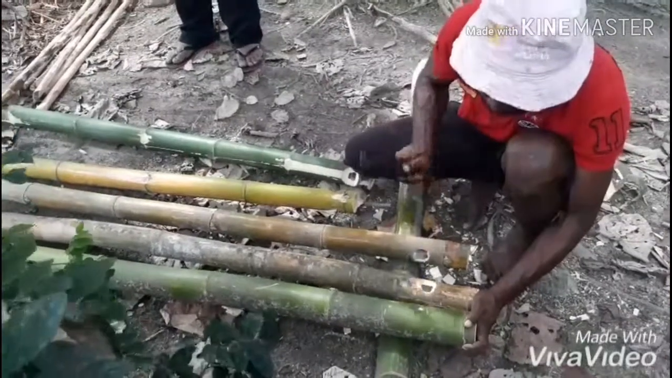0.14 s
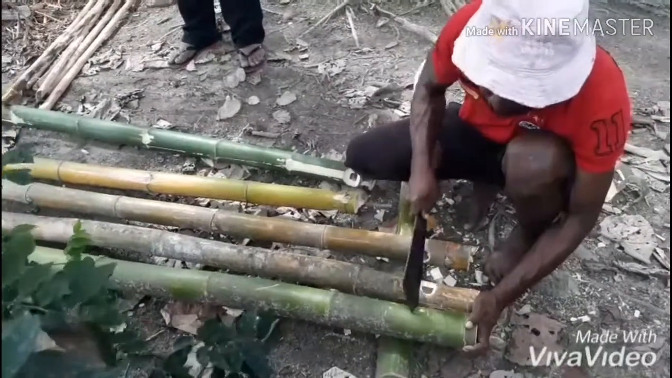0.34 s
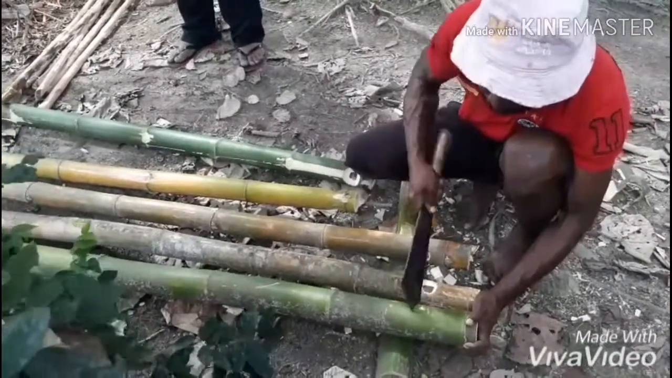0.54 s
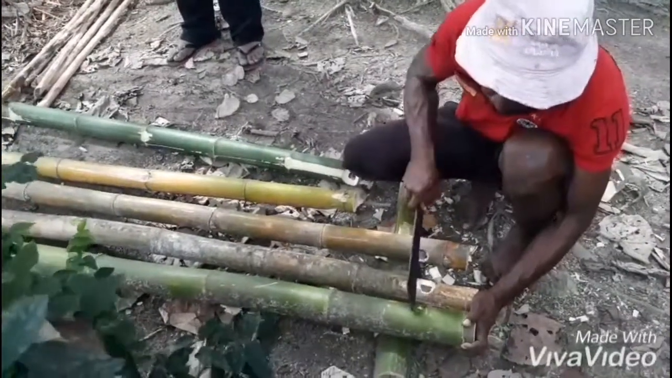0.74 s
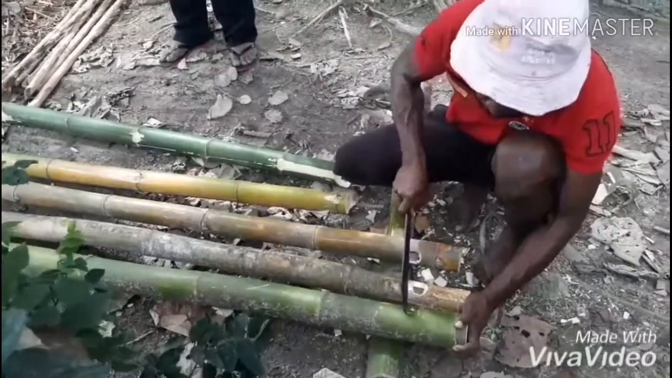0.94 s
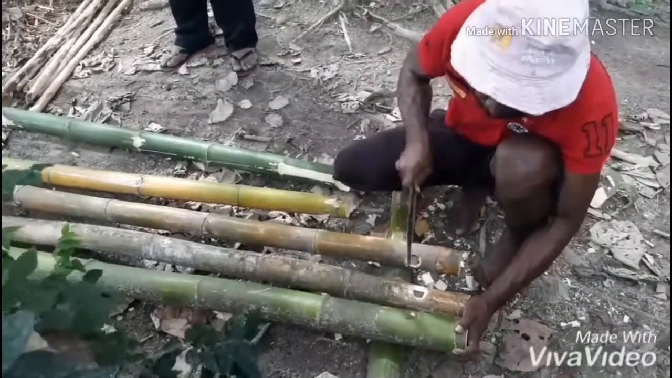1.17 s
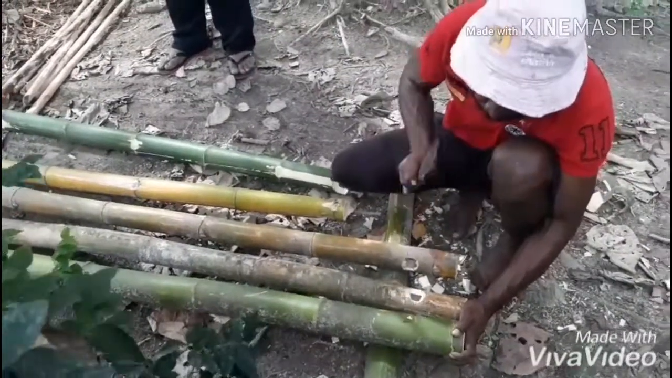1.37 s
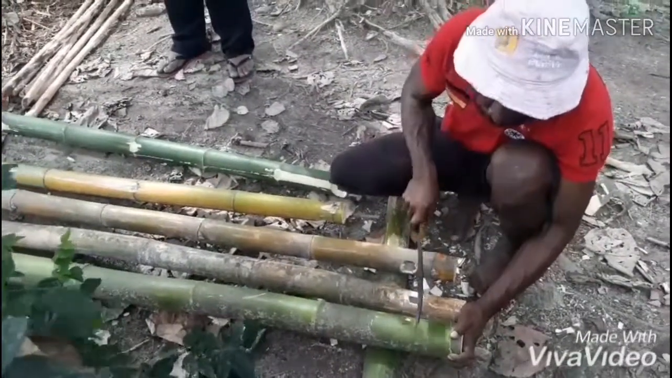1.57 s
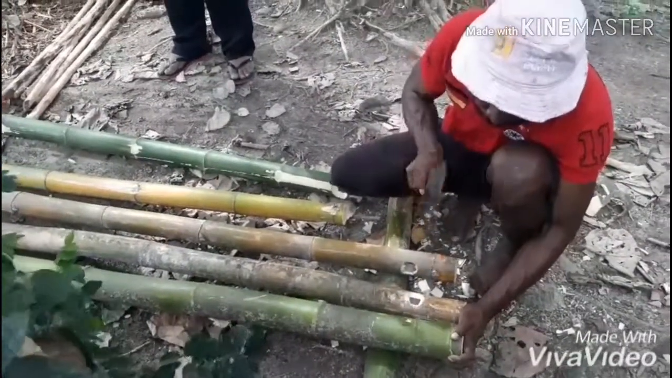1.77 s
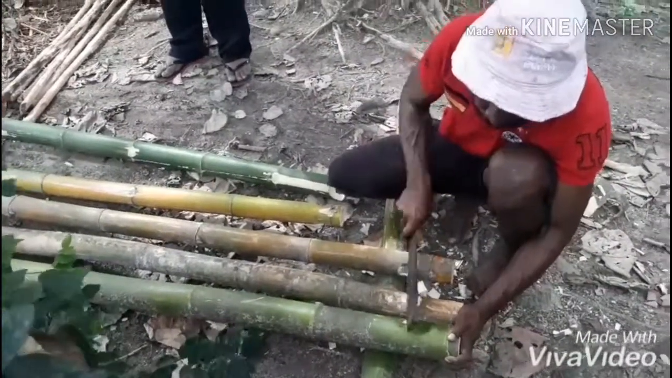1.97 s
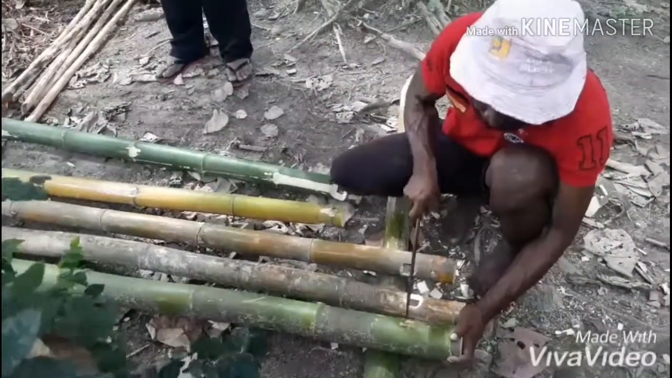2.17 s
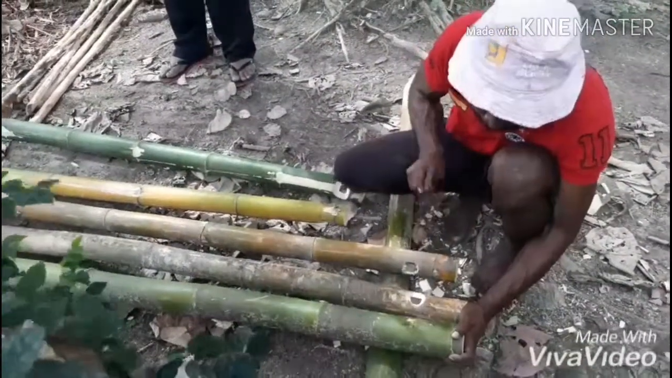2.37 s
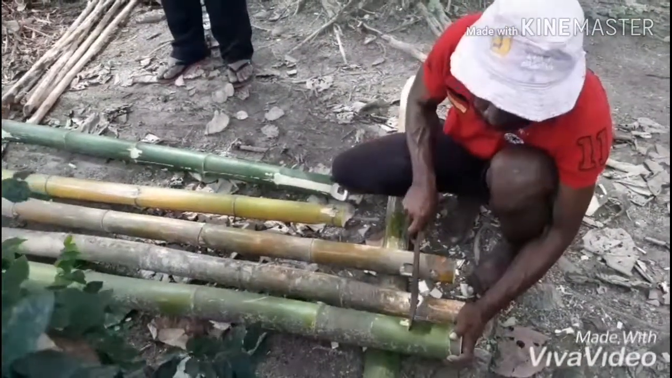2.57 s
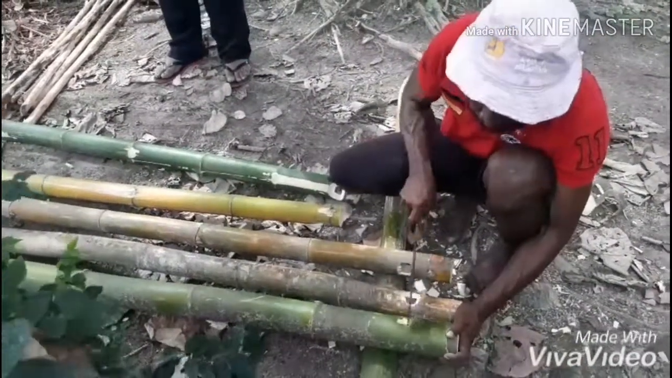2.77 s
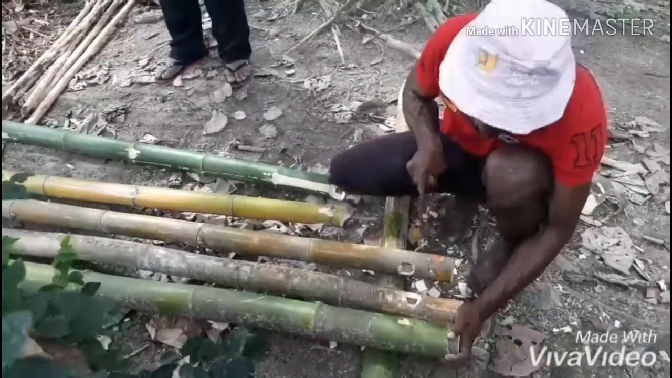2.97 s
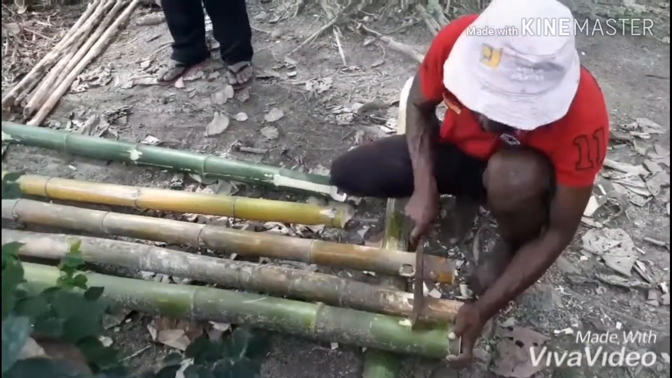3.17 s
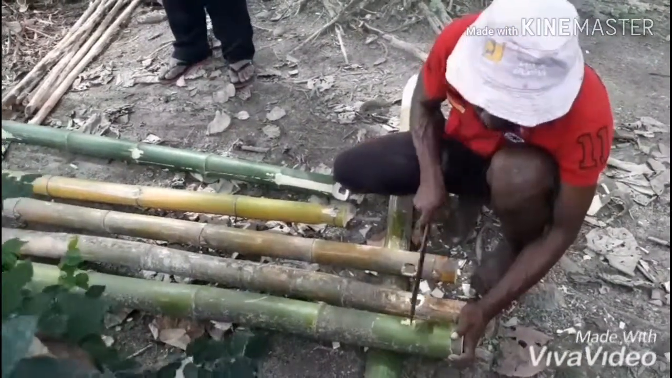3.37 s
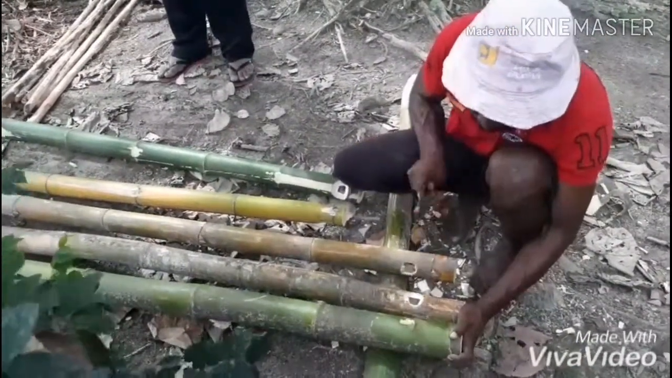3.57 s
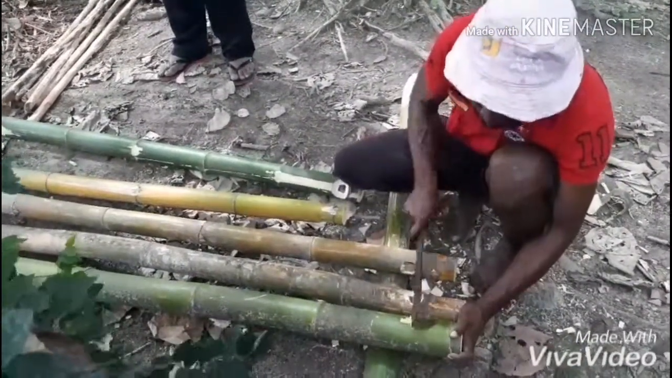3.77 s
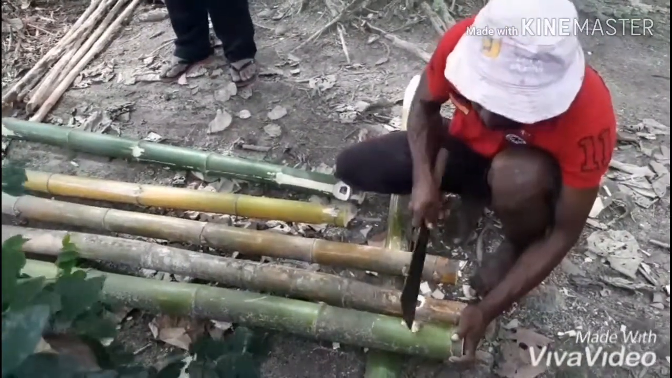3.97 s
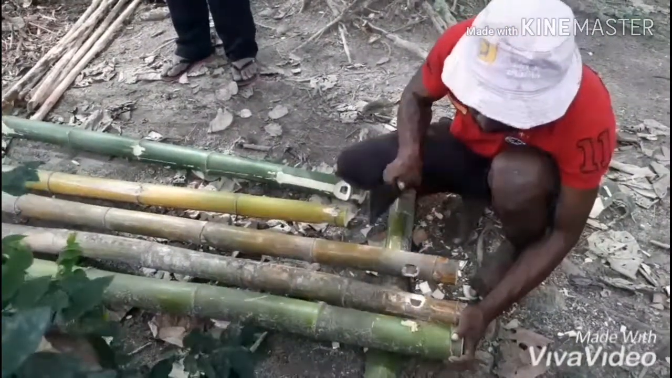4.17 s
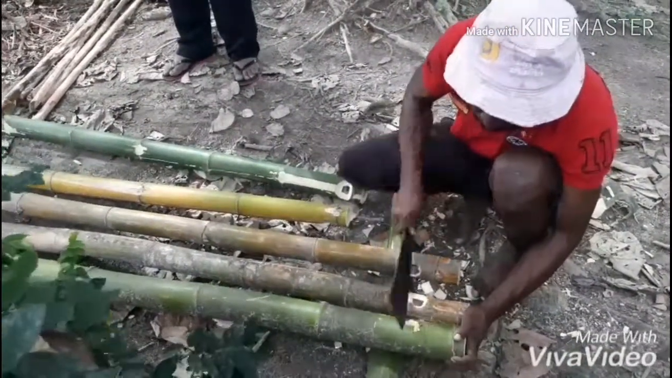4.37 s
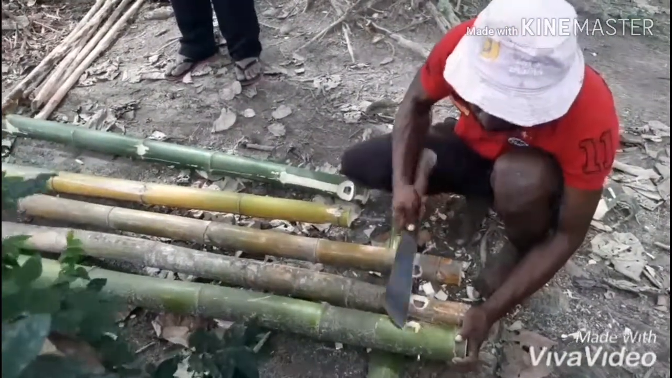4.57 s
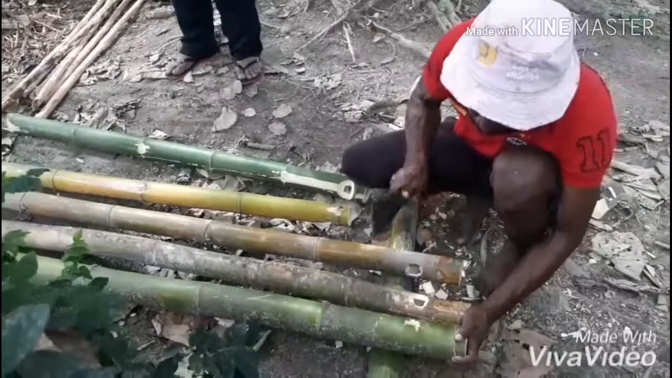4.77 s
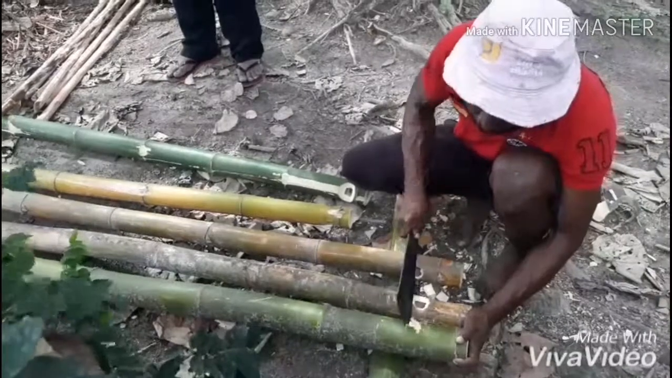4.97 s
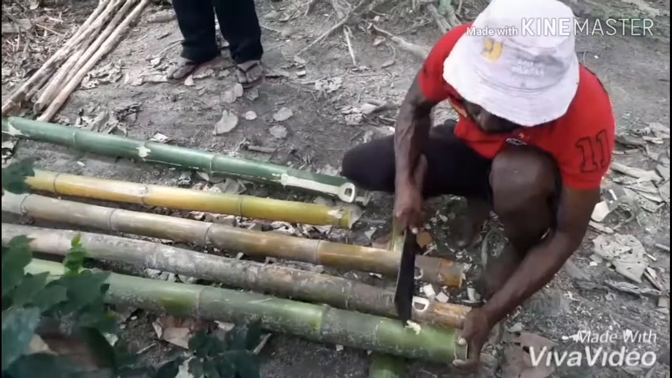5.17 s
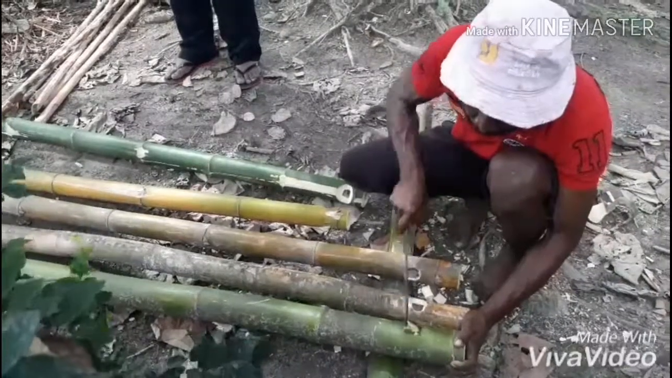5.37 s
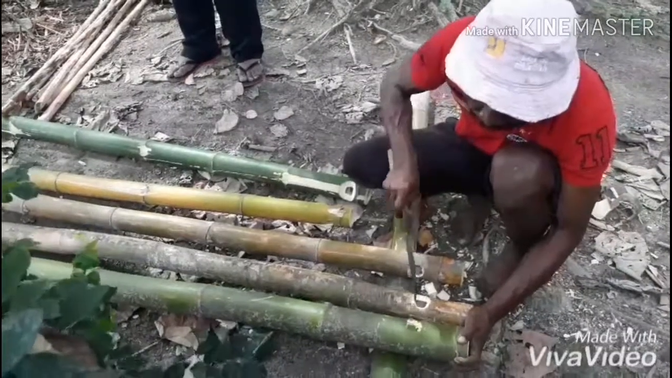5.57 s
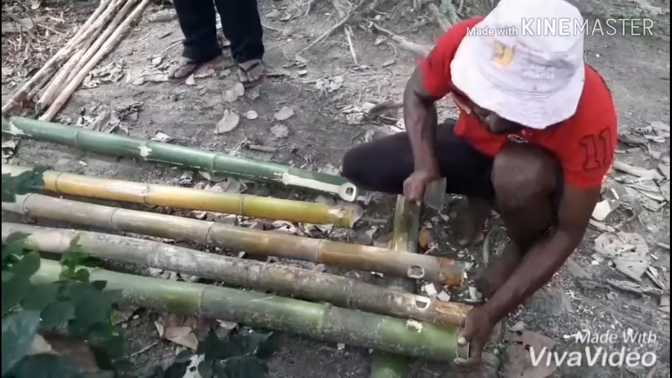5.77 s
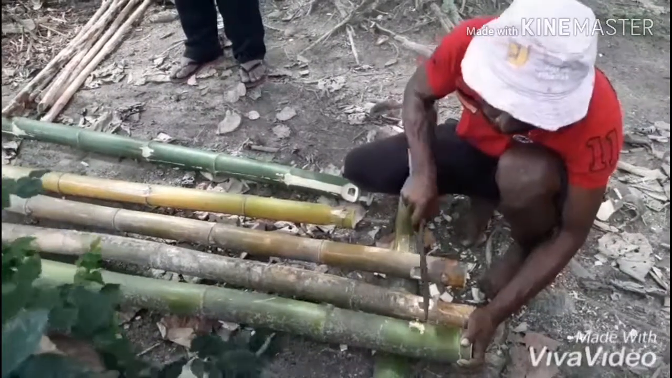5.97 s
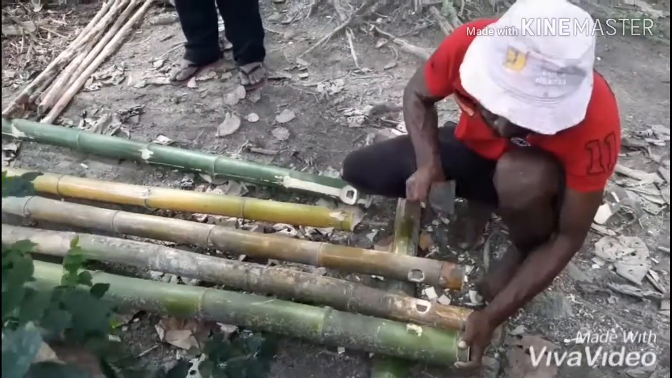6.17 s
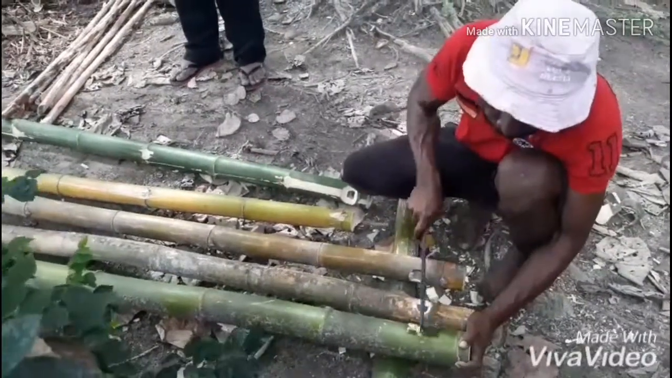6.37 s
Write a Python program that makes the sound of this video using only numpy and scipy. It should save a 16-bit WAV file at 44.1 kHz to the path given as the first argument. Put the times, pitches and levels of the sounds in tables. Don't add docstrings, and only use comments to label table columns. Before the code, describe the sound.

Outdoors on bare ground, a heavy blade chops a notch in a bamboo pole a couple of metres away. Each loud blow crunches through fibre, knocks hollow and leaves a short woody ring. Chips tick down and the blade once scrapes free. Near the end come light knocks and a weak bite, then two strong chops. Wind thumps the phone microphone over faint leaf hiss.

```python
import sys
import numpy as np
from scipy import signal
from scipy.fft import rfft, irfft
from scipy.io import wavfile
from scipy.ndimage import uniform_filter1d

SR = 44100
rng = np.random.default_rng(int(sys.argv[2]) if len(sys.argv) > 2 else 0)


def pcm_store(signal):
    levels = np.round(np.clip(np.atleast_2d(signal), -1, 1) * 32767)
    wavfile.write(sys.argv[1], SR, levels.astype(np.int16).T)


def convert_level_to_amplitude(level_db):
    exponent = np.asarray(level_db, float) / 20
    return 10 ** exponent


N = 284004
TIME = np.arange(SR // 2) / SR

# frequency in Hz, level in dB per Hz.
CRUNCH = [(180, -41.5), (400, -10.5), (800, -15.5), (1580, -9), (2070, -2.5), (2800, -2.5), (4090, -12),
          (4750, -6), (5250, -22), (5800, -7), (8790, -15), (15000, -27.5), (16000, -43.5)]
# strongest eddy in seconds, its peak in dB, its frequency in Hz,
# build in seconds, fall in seconds.
GUSTS = [(.051, -31, 141, .01, 0.024), (.682, -27, 126, 0.0091, .01), (.908, -37, 100, 0.035, 0.024),
         (.972, -24, 150, 0.0089, 0.081), (1.059, -21, 209, 0.073, .05), (1.103, -13.5, 157, 0.051, 0.038),
         (1.535, -21.5, 123, 0.078, 0.065), (1.684, -35, 179, 0.023, 0.035),
         (1.801, -28, 229, 0.011, 0.011), (1.878, -31.5, 165, 0.079, 0.018),
         (1.932, -22.5, 212, .01, 0.047), (1.966, -21.5, 207, 0.059, .01), (2.824, -20, 270, .006, .02),
         (2.840, -10, 210, 0.021, 0.03), (2.880, -25, 191, .008, 0.01), (3.648, -28, 121, 0.09, 0.017),
         (3.688, -27, 195, .01, 0.021), (3.982, -31, 174, 0.072, 0.0091), (4.25, -35.5, 140, 0.074, 0.17),
         (4.598, -26.5, 180, .05, 0.017), (5.896, -28.5, 178, 0.08, 0.026),
         (5.931, -23.5, 157, 0.025, 0.045), (6.119, -31.5, 149, 0.11, .04), (6.321, -37.5, 139, 0.1, 0.018)]


def add(out, start_s, x):
    i = max(int(start_s * SR), 0)
    out[i:i + len(x)] += x[:len(out) - i]


def fade(t60_s):
    return np.exp(-np.log(1000) * TIME / t60_s)


def rise(rise_s):
    return np.minimum(TIME / rise_s, 1)


def sine(hz):
    return np.sin(2 * np.pi * hz * TIME)


def noise(spectrum, count):
    hz, db = np.transpose(spectrum)
    f = np.maximum(np.fft.rfftfreq(count, 1 / SR), 1)
    gain = convert_level_to_amplitude(np.interp(np.log(f), np.log(hz), db, -90, -90))
    x = irfft(rfft(rng.standard_normal(count)) * gain, count)
    return x / np.std(x)


def around(hz, spread):
    edges_hz = [hz / (1 + spread), min(hz * (1 + spread), .45 * SR)]
    sos = signal.butter(2, edges_hz, "bandpass", fs=SR, output="sos")
    band = signal.sosfilt(sos, rng.standard_normal(len(TIME)))
    return band / np.std(band)


def split(x, hz):
    dull = signal.lfilter(*signal.butter(2, hz, fs=SR), x)
    return dull, x - dull


def walk(rate_hz):
    k = int(SR / rate_hz)
    held = np.repeat(rng.standard_normal(N // k + 1), k)
    return 1.26 * uniform_filter1d(uniform_filter1d(held, k), k)[:N]


def ring(modes, scatter_db=0.):
    out = np.zeros(len(TIME))
    for hz, db, t60_s in modes:
        strike, detune, phase = rng.standard_normal(3)
        tone = np.sin(2 * np.pi * hz * (1 + 0.007 * detune) * TIME + phase)
        out += convert_level_to_amplitude(db + scatter_db * strike) * fade(t60_s) * tone
    return out


def returns(x, first_db, later_db):
    round_trip_s = .0191
    out = x.copy()
    for k in range(4):
        add(out, (k + 1) * round_trip_s, convert_level_to_amplitude(first_db + k * later_db) * x)
    return out


def throb(hz, peak_s, spread_s, db, first_db, later_db):
    swell = np.exp(-((TIME - peak_s) / spread_s) ** 2 / 2) * rise(.003)
    tone = sine(hz * (1 + .008 * rng.standard_normal()))
    rough = .3 * returns(swell, first_db, later_db) * around(hz, spread=.1)
    return convert_level_to_amplitude(db) * (returns(swell * tone, first_db, later_db) + rough)


def fibre_crunch(wall_db, notch_db, sliver_hz):
    crunch_db = -14 - .2 * (wall_db + 18.5)
    cut = rise(0.00027) / (1 + (TIME / 0.0039) ** 3.6)
    buzz = 1.15 * sine(sliver_hz) + .6 * around(sliver_hz, spread=0.05)
    sliver = convert_level_to_amplitude(-8.5) * cut * buzz
    body, edge = split(returns(cut, -20.0, -7.0) * noise(CRUNCH, len(TIME)), 5900)
    body_db = 0.53 * notch_db + 10.5
    return convert_level_to_amplitude(crunch_db + 4.0) * (convert_level_to_amplitude(body_db) * body + edge + sliver)


def pole_throbs(hollow_db, wall_db, notch_db, late):
    # frequency in Hz, peak in seconds, spread in seconds, level in dB, first return in dB,
    # change per later return in dB.
    hollow = (862, .0080, .0036, 2, 0.5, -11)
    wall = (1250, .0090, .0036, 3, -7, -7)
    notch = (1965, .0065, .0036, 1.5, -11, -7)
    # frequency in Hz, level in dB, t60 in seconds.
    linger = [(833, -31, 0.37), (902, -34.5, .36)]
    parts = convert_level_to_amplitude(hollow_db) * throb(*hollow) + convert_level_to_amplitude(wall_db) * throb(*wall) + convert_level_to_amplitude(notch_db) * throb(*notch)
    return parts + convert_level_to_amplitude(hollow_db + 11.5) * late * ring(linger, scatter_db=1.5)


def ragged(x):
    streak_octaves, streak_db = .12, 2
    octaves = np.log2(np.maximum(np.fft.rfftfreq(len(x), 1 / SR), 50) / 50)
    bumps = np.interp(octaves / streak_octaves, np.arange(200), rng.standard_normal(200))
    return irfft(rfft(x) * convert_level_to_amplitude(streak_db * bumps), len(x))


def yard_wash(blow_db, late):
    # frequency in Hz, level in dB per Hz.
    yard = [(71, -33.5), (120, -6.5), (393, -0.5), (630, -11.5), (839, -4.5), (1430, -7.5), (2110, -4.5),
            (4410, -20), (5630, -19), (6370, -24), (7200, -22), (13900, -42.5), (16000, -49)]
    # frequency in Hz, level in dB, t60 in seconds.
    poles = [(252, -29, 0.16), (393, -29, 0.34), (444, -27, 0.25), (552.6, -30.5, 0.27), (800, -17.5, 0.15),
             (838, -28, 0.25), (878, -21, 0.18), (988, -23.5, 0.13), (1193, -18, 0.089), (1256, -16, 0.14),
             (1478, -25, 0.077), (1754, -29.5, 0.17), (1973, -19, 0.066), (2154, -12, 0.062),
             (2340, -36, .12), (2780, -19.5, .12), (3035, -27.5, 0.11), (3553, -20.5, 0.068),
             (4800, -29.5, 0.077), (5500, -31.5, .06)]
    shake_db = 0.41 * blow_db
    scatter = convert_level_to_amplitude(-19.5) * fade(0.16) + convert_level_to_amplitude(-19) * fade(0.36)
    patches = convert_level_to_amplitude(1.4 * walk(150)[:len(TIME)])
    tail = ragged(noise(yard, len(TIME))) * scatter * patches
    dull, bright = split(tail + ring(poles, scatter_db=2.5), 1000)
    return convert_level_to_amplitude(1.5 + shake_db) * late * dull + convert_level_to_amplitude(2.5 + shake_db) * rise(0.0061) * bright


def chops():
    # start in seconds, peak in dB, then hollow, wall and notch in dB relative to the peak.
    blows = [(0.348, -0.5, -15.5, -19, -12.5), (1.582, 2, -17, -18.5, -10.5),
             (2.039, -2.5, -11.5, -16, -15), (2.595, -3, -11, -27, -14.5), (3.267, 0.5, -11.5, -20, -8.5),
             (3.8455, -3, -12.5, -10, -35), (4.484, 1, -9.5, -14, -12), (5.039, -4.5, -29, -19, -11.5),
             (5.449, -19, -29, -20.5, -11), (5.9654, -1, -15.5, -39, -33), (6.380, 1.5, -18, -17, -11)]
    slivers_hz = [4610, 5620, 4860, 4760, 5720, 5200, 6980, 7360, 9600, 4640, 4580]
    out = np.zeros(N)
    late = rise(0.02) ** 1.56
    for (start_s, db, hollow_db, wall_db, notch_db), sliver_hz in zip(blows, slivers_hz):
        crunch = fibre_crunch(wall_db, notch_db, sliver_hz)
        pole = pole_throbs(hollow_db, wall_db, notch_db, late)
        add(out, start_s, convert_level_to_amplitude(db) * (crunch + pole + convert_level_to_amplitude(-4.0) * yard_wash(db, late)))
    return out


def blade():
    # start in seconds, peak in dB.
    knocks = [
        (5.345, -42.5),
        (5.503, -39),
        (5.668, -34),
    ]
    # frequency in Hz, level in dB, t60 in seconds.
    knock_modes = [(349.3, -1.5, 0.25), (1126, 1, 0.067), (1287, 5, 0.048)]
    # release in seconds, level in dB, scrape length in seconds.
    scrapes = [
        (1.203, -42.5, 0.028),
        (5.595, -49, 0.013),
    ]
    # frequency in Hz, level in dB, t60 in seconds.
    steel = [(2020, 4, 0.091), (8300, -14, .05), (10080, -14, .13), (11800, -16, .07), (13400, -12, .09)]
    out = np.zeros(N)
    for start_s, db in knocks:
        add(out, start_s, convert_level_to_amplitude(db - 5.5) * rise(0.0024) * ring(knock_modes))
    for release_s, db, scrape_s in scrapes:
        rub = noise(CRUNCH, len(TIME)) * np.exp(-((TIME - .1) / scrape_s) ** 2)
        add(out, release_s - .1, convert_level_to_amplitude(db - 4) * rub)
        add(out, release_s, convert_level_to_amplitude(db) * rise(0.0018) * ring(steel))
    return out


def chips():
    # start in seconds, peak in dB, frequency in Hz, t60 in seconds.
    landings = [(.581, -51, 5200, .025), (.604, -49, 2900, .025), (.883, -42, 2500, .025),
                (1.183, -55, 9000, .02), (1.280, -36, 2600, .022), (3.043, -37, 2500, .025),
                (3.102, -48, 7500, .02), (4.075, -55, 7000, .02), (4.097, -54, 7500, .02),
                (4.133, -43, 3500, .03), (4.135, -50, 10000, .03), (4.217, -51, 5000, .02),
                (4.461, -50, 7000, .02), (4.625, -50, 8000, .04), (4.707, -41, 8200, .03),
                (4.937, -51, 7000, .03), (5.348, -53, 8500, .02), (5.355, -46, 7000, .02),
                (5.432, -47, 5000, .02), (5.439, -49, 10000, .04), (5.449, -38, 10000, .02),
                (5.787, -51, 5500, .02), (2.99, -55, 9000, .02), (5.23, -54, 8000, .02),
                (1.281, -52, 7500, .02), (3.045, -52, 9000, .02)]
    out = np.zeros(N)
    for start_s, db, hz, t60_s in landings:
        tick = fade(t60_s) * (0.9 * sine(hz) + 0.74 * around(hz, spread=0.3))
        add(out, start_s, convert_level_to_amplitude(db + 5) * tick / np.abs(tick).max())
    return out


def eddies(lead_s):
    gap_s, side_hz, scatter_db = .014, 151, 3
    k = np.arange(-9, 10)
    side = k != 0
    rows = []
    for peak_s, db, hz, build_s, fall_s in GUSTS:
        when, size, pitch, turn = rng.standard_normal((4, len(k)))
        dt = gap_s * (k + .33 * when * side)
        drop_db = 20 * np.abs(dt / np.where(dt < 0, build_s, fall_s)) ** 1.47
        level_db = db - drop_db + scatter_db * size * side
        eddy_hz = np.where(side, side_hz * np.exp(.17 * pitch), hz)
        rows += zip(peak_s + dt, level_db, eddy_hz, turn)
    return [row for row in rows if row[1] > -70 and row[0] > lead_s]


def wind(air_db):
    # frequency in Hz, level in dB per Hz.
    rumble = [(15, -58), (30, -30.5), (50, -1.5), (90, 1), (160, -5.5), (240, -8), (330, -10), (400, -13),
              (600, -33.5), (900, -45)]
    now_s = np.arange(N) / SR
    swell = np.zeros(N)
    for peak_s, db, _, build_s, _ in GUSTS:
        slope_s = np.where(now_s < peak_s, 0.44 * build_s, 0.034)
        swell += convert_level_to_amplitude(db - 26.5) * np.exp(-np.abs(now_s - peak_s) / slope_s)
    out = (convert_level_to_amplitude(air_db - 1) + swell) * convert_level_to_amplitude(4.06 * walk(25)) * noise(rumble, N)
    lead_s = .03
    t = TIME[:SR // 10] - lead_s
    for peak_s, db, hz, turn in eddies(lead_s):
        cycles = hz * t
        kick = np.exp(-np.where(t < 0, 1.6, 1.1) * np.abs(cycles))
        swing = kick * np.sin(2 * np.pi * (0.92 * cycles - 0.15 * cycles ** 2 + turn))
        crest = np.exp(-(3.4 * cycles) ** 2) * np.sin(2 * np.pi * (1.92 * cycles + turn))
        crest_db = -3.0 + 0.36 * db
        add(out, peak_s - lead_s, convert_level_to_amplitude(db) * (swing + convert_level_to_amplitude(crest_db) * crest))
    return out


def leaves_and_village(air_db):
    # frequency in Hz, level in dB per Hz.
    leaves = [(260, -38), (450, -4.5), (600, -6.5), (900, -3), (1440, -3), (2000, -0.5), (2500, -2),
              (2900, -7), (3500, -13.5), (4500, -18.5), (6500, -19.5), (8000, -22.5), (10500, -29.5),
              (16500, -33)]
    hum, hiss = split(noise(leaves, N), 5200)
    return convert_level_to_amplitude(air_db) * (convert_level_to_amplitude(0.23 * walk(10)) * hum + convert_level_to_amplitude(3.5 + 1.2 * walk(12)) * hiss)


def scene():
    # time in seconds, level in dB.
    breeze = [(0.0, -47), (0.36, -51.5), (0.57, -53.5), (1.0, -53.5), (1.68, -49.5), (3.34, -54.5),
              (3.5, -58.5), (3.87, -60.5), (4.02, -55.5), (4.32, -51), (4.48, -49.5), (4.9, -55),
              (5.49, -49.5), (5.94, -50.5), (6.19, -49), (6.44, -48.5)]
    air_db = np.interp(np.arange(N) / SR, *np.transpose(breeze))
    return (chops() + blade() + chips() + wind(air_db) + leaves_and_village(air_db))[None]


def band_limit(x):
    return signal.sosfilt(signal.butter(12, 16690, fs=SR, output="sos"), x)


def record(dry):
    # frequency in Hz, width in Hz, level in dB.
    port = [(5390, 730, 5.5), (8700, 540, 5.5), (4700, 390, 3)]
    f = np.fft.rfftfreq(N, 1 / SR)
    port_db = sum(db / (1 + (2 * (f - hz) / width_hz) ** 2) for hz, width_hz, db in port)
    bass_cut = f ** 2 / (f ** 2 + 27.0 ** 2)
    coloured = irfft(rfft(dry) * bass_cut * convert_level_to_amplitude(port_db), N)
    rounded = np.tanh(0.89 * coloured) / 0.96
    top_cut = signal.ellip(6, .2, 40, 15550, fs=SR, output="sos")
    return band_limit(signal.sosfilt(top_cut, rounded))


dry = scene()
out = record(dry)
pcm_store(out)
```